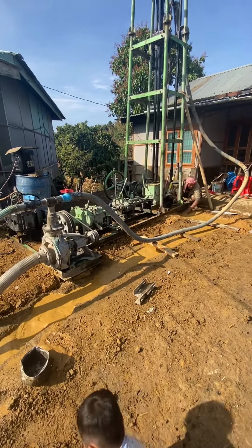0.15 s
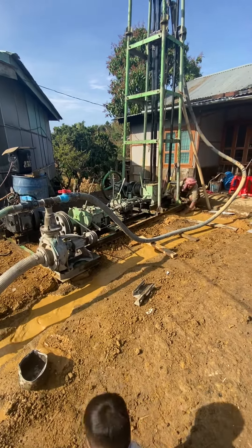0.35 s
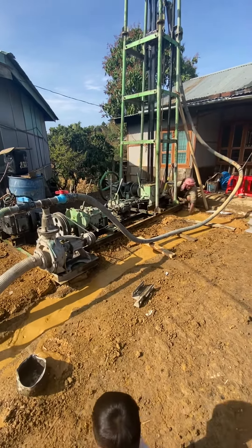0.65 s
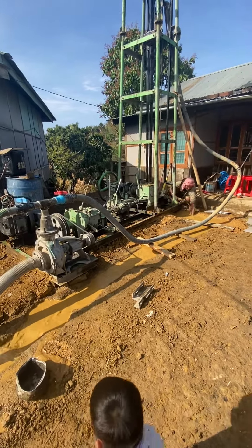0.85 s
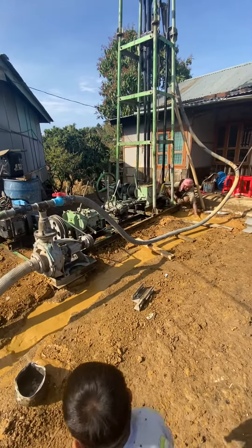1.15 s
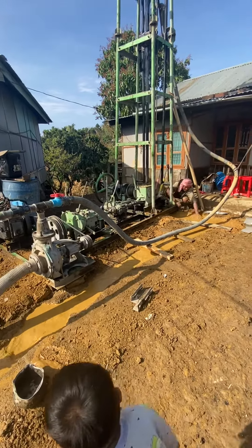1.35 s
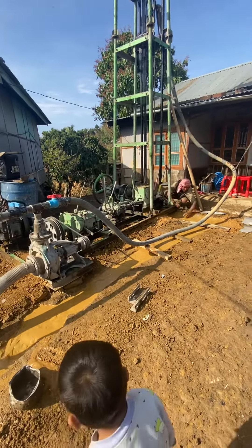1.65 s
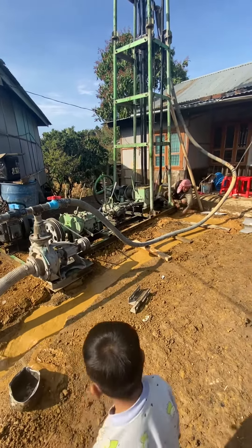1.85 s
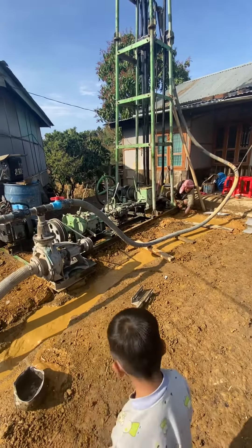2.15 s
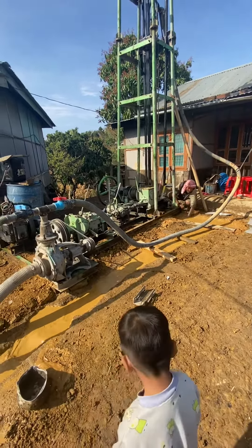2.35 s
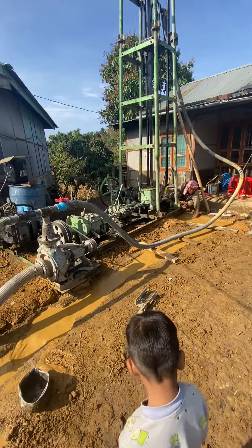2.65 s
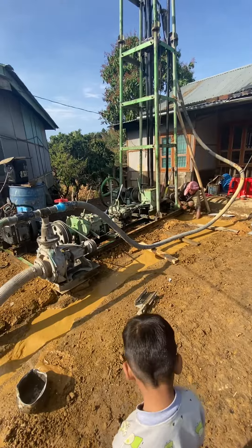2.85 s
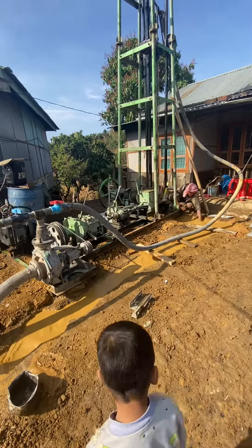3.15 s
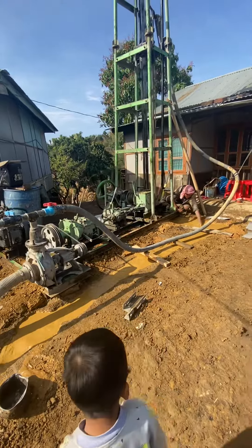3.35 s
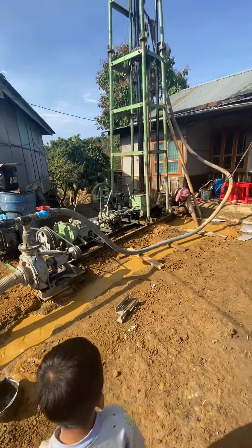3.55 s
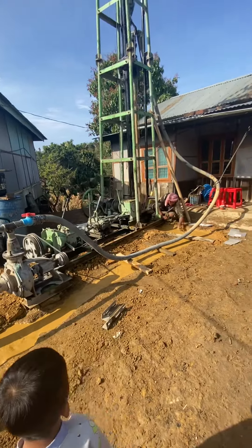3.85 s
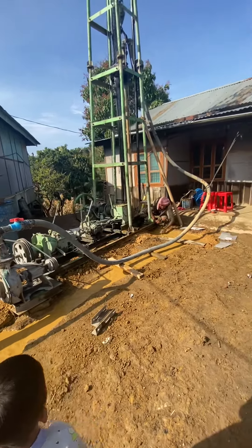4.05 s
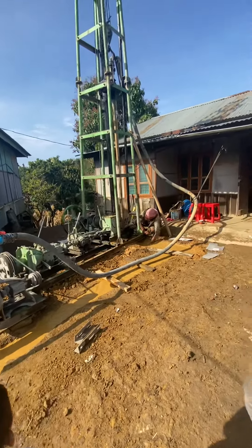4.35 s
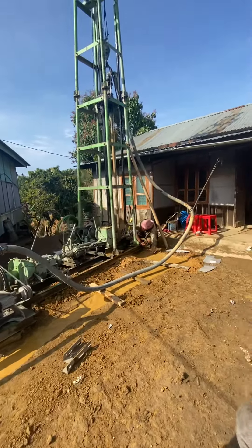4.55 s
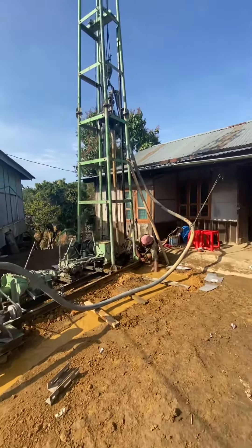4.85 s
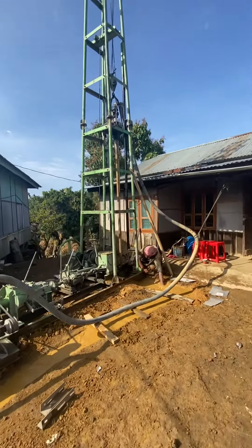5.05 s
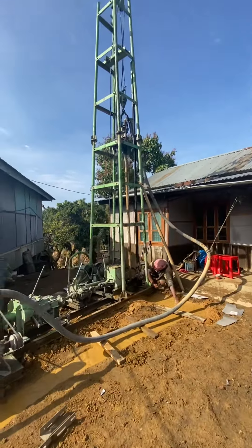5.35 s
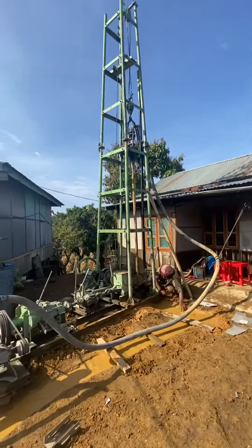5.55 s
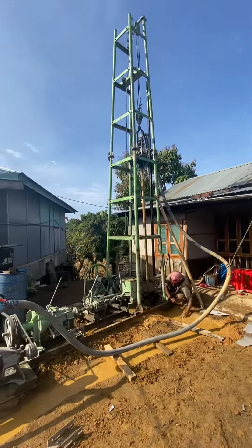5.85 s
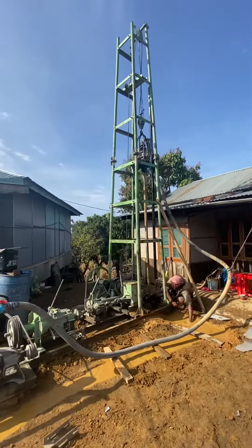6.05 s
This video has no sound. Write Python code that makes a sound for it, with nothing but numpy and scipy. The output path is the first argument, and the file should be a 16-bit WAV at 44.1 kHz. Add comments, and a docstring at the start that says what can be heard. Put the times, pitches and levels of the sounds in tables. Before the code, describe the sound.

A nearby diesel engine driving a mud pump runs without pause, about eight sharp knocks a second, slightly uneven in strength. Loose metal rattles between strokes, the exhaust thuds low, and a grainy rush of water and belts continues underneath. Captured in stereo by a handheld device in an open yard, it begins hard and clattery, then from four seconds turns duller, with a lower, hollow flywheel ring.

```python
"""Diesel engine driving a mud pump

A single-cylinder diesel drives a drilling rig's mud pump in a yard, firing about 8.4 times a second.
Each firing strikes decaying tones in the block and flywheel; shaped noise makes its crack and clatter.
A short burst of two low waves makes the deep exhaust thud. The pump drones, thumps and rushes underneath.
The listener turns away: the knock softens and a lower flywheel tone comes out.
"""
import sys
import numpy as np
from scipy.fft import rfft, irfft, next_fast_len
from scipy.io import wavfile
from scipy.ndimage import map_coordinates

SR = 44100
rng = np.random.default_rng(int(sys.argv[2]) if len(sys.argv) > 2 else 0)


def master(y):
    """Save y as 16-bit WAV."""
    cut = np.clip(np.atleast_2d(y).T, -1, 1)
    pcm = np.round(cut * 32767)  # scale
    wavfile.write(sys.argv[1], SR, pcm.astype(np.int16))


N = 273420  # samples, 6.2 s
TIME = np.arange(N) / SR  # seconds, whole scene
CYCLE = np.arange(SR // 2) / SR  # seconds since one firing

# Engine speed: start_s, firings_per_s
SPEED = [(2.1, 8.448), (2.5, 8.4345)]
FIRST_FIRING_S = 0.0714
TIMING_SCATTER_S, BURN_SCATTER_DB = 0.0001, 0.85  # random spread from one firing to the next
# The listener turning away from the engine: start_s, turn (0 facing, 1 away)
TURN = [(0, 0), (3, 0.13), (3.7, 0.2), (4.4, 0.53), (5, 1), (6.2, 0.97)]
# Combustion knock: start_s, level_db, swing_db (added and subtracted on alternate strokes)
KNOCK = [(0, -12.5, 0.3), (2.2, -13, 1.05), (3.25, -12.6, .5), (4.65, -19, 0), (6.2, -17.5, 0)]
# Strength before each layer's own trim: start_s, exhaust_db, hiss_db
EXHAUST_AND_HISS = [(0, -21, -45), (1, -20.5, -45.5), (3.1, -21, -44.5), (4.3, -21.5, -45.5),
                    (5.3, -23, -45), (6.2, -22.5, -47)]
# Upper flywheel tone: start_s, level_db
UPPER_RING = [(0, -16.5), (2.7, -18), (3.3, -14), (3.8, -15), (4.5, -15.5), (5.1, -14.5), (5.6, -21),
              (6.2, -17.5)]
# Lower flywheel tone, before its trim: start_s, level_db
LOWER_RING = [(0, -41), (3.2, -38.5), (3.8, -28), (4.4, -24.5), (5.2, -19.5), (5.7, -22.5), (6.2, -30.5)]
# Resonances of block and covers, before their trim:
# pitch_hz, level_db, t60_s (time to fall 60 dB), delay_s, change_when_turned_db
BLOCK_TONES = [(341, -13, 0.071, .006, -1), (754, -26, 0.11, .003, 9), (832, 9, 0.034, .003, -2.5),
               (848, -6.5, 0.082, -0.0053, 1), (988, -18, 0.06, .003, 14.5),
               (1097, -7.5, 0.09, .0015, -4.5), (1335, -6.5, 0.044, 0.0055, 2.5),
               (1458, 1, 0.027, .0004, 2), (1593, -5, 0.048, .0002, 2.5), (1870, -13, .03, 0, 2),
               (2124, -9.5, 0.042, -0.00011, 1.5), (2312, -4.5, 0.049, 0.00121, -1),
               (2393, -2.5, 0.047, -.0005, -5.5), (2605, -10.5, 0.031, -.0003, 5)]
# Dull thumps of frame and pump: pitch_hz, level_db, t60_s, delay_s
THUMPS = [(126.7, -21.5, 0.1, .099), (178.4, -25.5, 0.094, .097), (387, -24, 0.034, .097),
          (165.6, -25.5, 0.097, 0.03593)]
# Valve gear and injector contacts, relative strength: delay_s, rise_s, t60_s, level_db
VALVE_TICKS = [(.0005, .001, 0.11, 5.5), (.009, 0.0025, 0.056, -1.5), (.029, 0.0049, 0.039, 18),
               (.071, .003, .12, -9), (.0945, .001, .06, -4)]
# Loose-part rattles and growls: centre_s, bell_width_s, pitch_hz, width_hz, facing_db, turned_db
RATTLES = [(0.0376, 0.0055, 1862, 55, -29.5, -38), (0.0304, 0.0032, 2500, 1400, -32.5, -36),
           (0.035, 0.0067, 4170, 200, -35, -32.5), (0.038, 0.0082, 3640, 210, -37.5, -38),
           (0.082, 0.0076, 1640, 200, -33.5, -39.5), (0.0797, 0.0096, 2370, 1700, -34, -38),
           (0.01198, 0.01, 5600, 850, -34, -50), (0.062, 0.041, 5490, 760, -43, -54),
           (0.0051, 0.0049, 2366, 120, -27.5, -33), (0.021, 0.021, 380, 180, -34.5, -39),
           (0.014, .016, 309.5, 67, -37, -47.5)]
# Relative noise colour of the knock's crack: pitch_hz, density_db (dB per Hz)
CRACK_COLOUR = [(200, -26), (400, -18), (600, -22), (720, 2), (820, 9), (1020, -3), (1500, -6.5),
                (1900, -5), (2400, -3.5), (3000, -12.5), (5500, -17), (8000, -23), (16000, -49)]
# Relative noise colour of the valve ticks: pitch_hz, density_db (dB per Hz)
TICK_COLOUR = [(800, -25), (2000, 6), (3500, -2.5), (5600, 4), (7300, 1), (10000, -0.5), (12500, -8),
               (16000, -15)]
# Relative noise colour of water and belts: pitch_hz, density_db (dB per Hz)
RUSH_COLOUR = [(25, -9), (70, -2.5), (170, -3.5), (260, -8.5), (400, 0), (530, -10.5), (700, -1.5),
               (1000, -3), (2200, -8), (3200, -13), (5600, -17), (7500, -23), (11000, -25), (16000, -34.5)]
# Relative colour of the pump's drone: pitch_hz, density_db (dB per Hz)
DRONE_COLOUR = [(25, -27), (50, 5.5), (70, 7), (100, -6.5), (122, -1), (170, -7), (240, -9), (350, -7),
                (500, -13.5), (1000, -14.5), (2500, -29.5), (6000, -74.5)]
# Rush of water and belts: start_s, level_db
RUSH_LEVEL = [(0, -31.5), (3.5, -31), (4.5, -31), (6.2, -33)]
# Left-right likeness of the noise, limited before use: pitch_hz, likeness (1 same, negative opposed)
LIKENESS = [(60, 0.74), (290, 1), (640, -0.4), (1400, 0.85), (3100, -0.11), (5600, 0.099), (6500, -0.5908),
            (7400, -1.28), (8600, -0.05), (10200, 1), (11800, 0.1606), (13200, -1.76), (15500, -0.59)]
# Left over right when facing the engine: pitch_hz, lean_db
LEAN_FACING = [(60, .7), (200, 1.5), (380, 3.5), (750, 1.5), (1300, 3), (2400, -2.5), (4400, -0.1924),
               (15000, -0.5)]
# Left over right when turned away: pitch_hz, lean_db
LEAN_TURNED = [(60, 1), (200, 0.5), (380, 3.5), (750, 7.5), (1300, 5.5), (2400, -1.5), (4400, 0),
               (15000, -0.6813)]
TOP_HZ = 15950  # nothing is kept from here up


def amp(db):
    """Turn decibels into gain."""
    return 10 ** (np.asarray(db) / 20)


def unit(x):
    """Scale to an rms (average strength) of 1."""
    return x / np.sqrt(np.mean(x ** 2) + 1e-20)


def along(points, hz):
    """Read a (Hz, value) table on a log pitch axis."""
    f, v = np.transpose(points)
    return np.interp(np.log(hz + 1), np.log(f + 1), v)


def curves(rows):
    """Give one value per sample for each column after the time."""
    s, *columns = np.transpose(rows)
    return [np.interp(TIME, s, column) for column in columns]


def filtered(x, response):
    """Shape a sound by multiplying its spectrum by a response."""
    size = next_fast_len(N + SR // 2)
    spectrum = rfft(x, size) * response(np.fft.rfftfreq(size, 1 / SR))
    return irfft(spectrum, size)[..., :N]


def noise(gain):
    """Stereo noise of rms 1: the mix of mid and side sets how alike left and right are at each pitch."""
    def mid_side_gain(hz):
        angle = np.arccos(np.clip(along(LIKENESS, hz), -0.96, 0.995)) / 2
        return gain(hz) * np.array([np.cos(angle), np.sin(angle)])

    mid, side = filtered(rng.standard_normal((2, N)), mid_side_gain)
    return unit(np.array([mid + side, mid - side]))


def coloured(spectrum):
    """Stereo noise with the colour of a (Hz, dB) table."""
    return noise(lambda hz: amp(along(spectrum, hz)))


def chatter(rate, depth_db):
    """Fast random gain, with rate new values a second: metal contacts break up into tiny bounces."""
    knots = rng.standard_normal(N // 8)
    return unit(amp(depth_db * map_coordinates(knots, [TIME * rate], order=1)))


def firings():
    """Time (s) and knock level (dB) of each firing: a nearly steady pace, strokes swinging hard and soft."""
    s, rate = np.transpose(SPEED)
    cycles = np.cumsum(np.interp(TIME, s, rate)) / SR
    cycles -= np.interp(FIRST_FIRING_S, TIME, cycles)
    stroke = np.arange(int(cycles[-1]) + 1)
    late, harder = rng.standard_normal((len(stroke), 2)).T
    start = np.interp(stroke, cycles, TIME) + TIMING_SCATTER_S * late
    level_db, swing_db = (np.interp(start, TIME, curve) for curve in curves(KNOCK))
    knock_db = level_db + swing_db * (-1) ** stroke + BURN_SCATTER_DB * harder
    return np.transpose([start, knock_db])


STROKES = firings()  # every part that repeats follows the same crank


def every_cycle(shape, scatter_db, follow=0):
    """Repeat a shape at each firing with random strength; follow is its share of the knock level in dB."""
    s, knock_db = np.transpose(STROKES)
    # the engine is already running, so add one firing before the start
    s = np.r_[2 * s[0] - s[1], s]
    knock_db = np.r_[knock_db[0], knock_db]
    gains = amp(follow * knock_db + scatter_db * rng.standard_normal(len(s)))
    out = np.zeros(N + 2 * SR)  # one spare second at each end
    for start, gain in zip(s, gains):
        out[SR + round(start * SR):][:len(shape)] += gain * shape
    return out[SR:SR + N]


def strike(delay, rise, t60):
    """One contact within a cycle: a quick rise, then a steady fall in dB."""
    t = np.maximum(CYCLE - delay, 0)
    return (1 - np.exp(-t / max(rise, 1e-5))) * amp(-60 * t / t60)


def swell(centre, length):
    """A bell-shaped rise and fall within a cycle."""
    return np.exp(-0.5 * ((CYCLE - centre) / length) ** 2)


def mode(hz, t60, delay, rise):
    """One struck resonance: a sine that rings and dies away."""
    return strike(delay, rise, t60) * np.sin(2 * np.pi * hz * (CYCLE - delay))


def pump_rush():
    """Muddy water and belts make a continuous grainy rush."""
    level_db, = curves(RUSH_LEVEL)
    return amp(level_db) * coloured(RUSH_COLOUR) * chatter(rate=250, depth_db=1.5)


def pump_drone():
    """Frame and pump drone in step with the crank: one random wave repeats, each copy fading into the next."""
    size = round(np.mean(np.diff(np.transpose(STROKES)[0])) * SR)
    hz = np.fft.rfftfreq(size, 1 / SR)
    random_phase = np.exp(2j * np.pi * rng.random(len(hz)))
    period = unit(irfft(amp(along(DRONE_COLOUR, hz)) * random_phase, size))
    return amp(-33) * every_cycle(np.tile(period, 2) * np.hanning(2 * size), scatter_db=2)


def thumps():
    """Dull resonances of the frame and pump are struck in every cycle."""
    shape = sum(amp(db) * mode(hz, t60, delay, rise=0.0012) for hz, db, t60, delay in THUMPS)
    return every_cycle(shape, scatter_db=1.0)


def knock():
    """Combustion cracks at once through thin covers; block tones ring too, and yard walls scatter it back."""
    turn, = curves(TURN)
    ring = 0
    for hz, db, t60, delay, turned_db in BLOCK_TONES:
        struck = every_cycle(mode(hz, t60, delay, rise=1.1 / hz), scatter_db=1.46, follow=1)
        ring = ring + amp(db + turn * turned_db) * struck
    crack = every_cycle(strike(delay=0, rise=0.00071, t60=0.054), scatter_db=0.5, follow=0.82)
    crack = crack * chatter(rate=1500, depth_db=3.0)
    yard = every_cycle(strike(delay=0.004, rise=0.0062, t60=0.18), scatter_db=1.5, follow=0.65)
    bursts = amp(-6.5) * crack + amp(-10.5) * yard
    return amp(-1.5) * ring + bursts * coloured(CRACK_COLOUR)


def valve_ticks():
    """Valve gear and injector contacts tick at fixed points of the cycle, as bursts of bright noise."""
    ticks = sum(amp(db) * every_cycle(strike(delay, rise, t60), scatter_db=2.5)
                for delay, rise, t60, db in VALVE_TICKS)
    hiss_db = curves(EXHAUST_AND_HISS)[1]
    return amp(hiss_db + 6.5) * ticks * chatter(rate=900, depth_db=1.0) * coloured(TICK_COLOUR)


def rattles():
    """Loose parts rattle and growl in every cycle, each a swell of noise around one pitch."""
    turn, = curves(TURN)
    hiss_db = curves(EXHAUST_AND_HISS)[1]
    drift_db = hiss_db - hiss_db.mean()
    out = 0
    for centre, length, hz, width, facing_db, turned_db in RATTLES:
        body = noise(lambda f: 1 / (1 + ((f - hz) / width * 2) ** 2))
        level_db = facing_db + turn * (turned_db - facing_db) + drift_db
        out = out + amp(level_db) * every_cycle(swell(centre, length), scatter_db=3.0) * body
    return out


def flywheel():
    """Two bell-like tones, struck in step by every firing, ring on into a whine."""
    upper_hz, lower_hz = 810, 540
    upper_db, = curves(UPPER_RING)
    lower_db, = curves(LOWER_RING)
    upper = every_cycle(mode(upper_hz, t60=0.28, delay=0.00408, rise=0.0015), scatter_db=1)
    # the lower tone reaches left and right at different moments
    lower = np.array([every_cycle(mode(lower_hz, t60=0.29, delay=delay, rise=0.011), scatter_db=2.0)
                      for delay in (0.004, 0.0037)])
    return amp(upper_db) * upper + amp(lower_db + 1.5) * lower


def exhaust():
    """The silencer turns each gas burst into a thud: a broad deep wave with a shorter, higher core."""
    centre = 0.05223  # seconds after firing

    def wave(hz, length):
        return swell(centre - 0.001, length) * np.cos(2 * np.pi * hz * (CYCLE - centre))

    thud = wave(hz=72, length=0.013) + amp(-8.5) * wave(hz=101.6, length=0.008)
    exhaust_db = curves(EXHAUST_AND_HISS)[0]
    return amp(exhaust_db + 9.5) * every_cycle(thud, scatter_db=0.0)


def scene():
    """Add all parts, then fade from the facing stereo balance to the turned one."""
    pump = pump_rush() + pump_drone() + thumps()
    machine = pump + knock() + valve_ticks() + rattles() + flywheel() + exhaust()

    def placed(lean):
        # half of the lean lifts the left, half lowers the right
        return filtered(machine, lambda hz: amp(np.array([[0.5], [-0.5]]) * along(lean, hz)))

    turn = np.clip(curves(TURN)[0], 0, 1)
    return (1 - turn) * placed(LEAN_FACING) + turn * placed(LEAN_TURNED)


def record(dry):
    """Cut off everything from the band limit up."""
    return filtered(dry, lambda hz: hz < TOP_HZ)


dry = scene()
out = record(dry)
master(out)
```